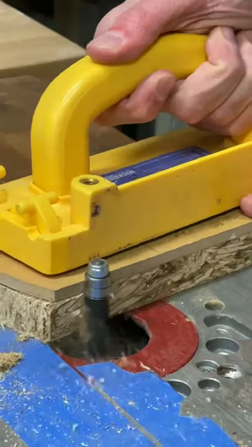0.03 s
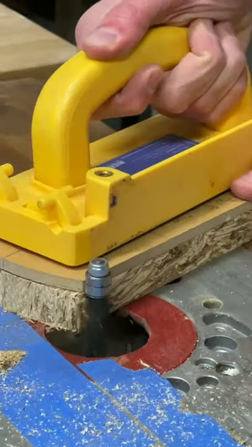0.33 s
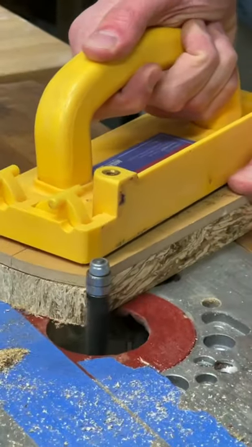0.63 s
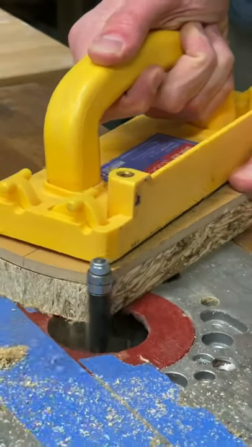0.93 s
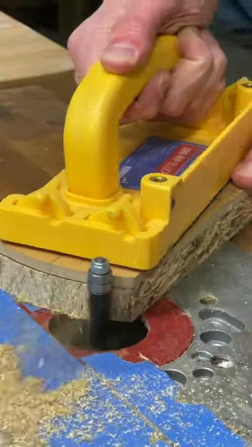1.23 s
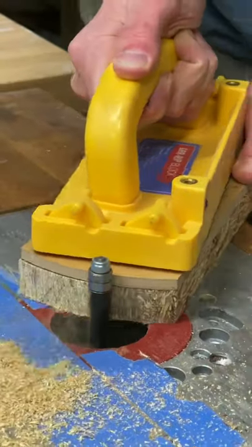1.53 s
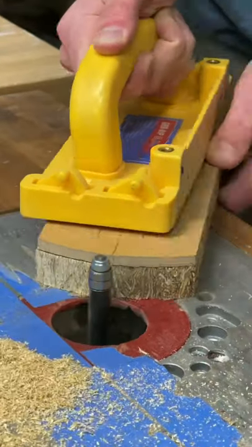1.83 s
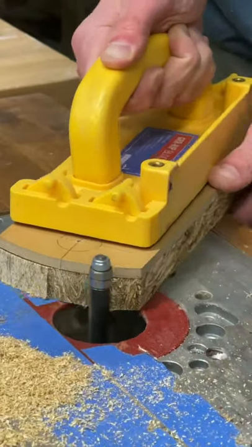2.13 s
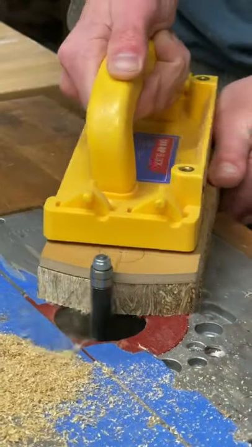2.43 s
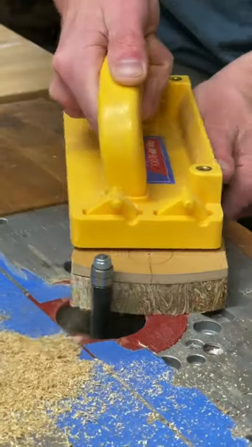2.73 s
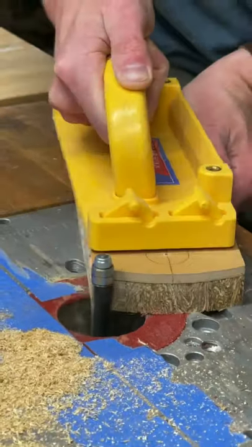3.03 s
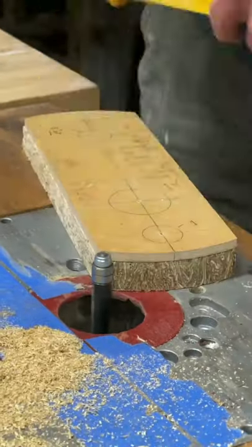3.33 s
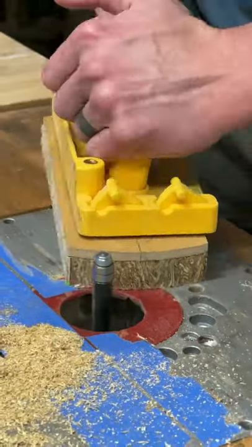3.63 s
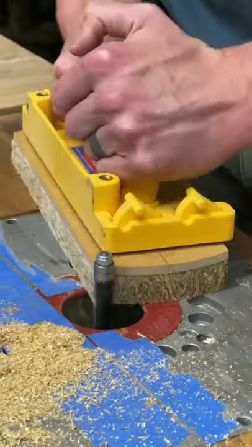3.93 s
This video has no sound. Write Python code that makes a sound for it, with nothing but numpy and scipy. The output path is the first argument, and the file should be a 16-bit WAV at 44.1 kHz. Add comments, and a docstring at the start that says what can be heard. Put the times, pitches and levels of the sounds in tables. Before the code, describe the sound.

A loud router bit rasps through wood, its whine sagging and rising again between cuts.

```python
"""A table router trims the end of a wooden board in three passes, over a rushing dust extractor. It starts in
the cut: the bit chops once a turn and sings in spindle harmonics, roughened by motor buzz, over a hiss of
chips. The motor sags under load, recovers at 1.7 s and sags in the second pass, 2.2 to 3.1 s; the noise dips
briefly after both. At 3.28 s the scene jumps to a faster pace, lifting every pitch. A push block bumps the
board, and the last pass starts at 3.8 s with a brief touch."""
import sys
import numpy as np
from scipy.fft import rfft, irfft, next_fast_len
from scipy.io import wavfile
from scipy.ndimage import uniform_filter1d, map_coordinates

SR = 44100
rng = np.random.default_rng(int(sys.argv[2]) if len(sys.argv) > 2 else 0)


def to_wav(sig):
    """Store sig (one row per channel, or 1-D mono) as 16-bit WAV at the path in sys.argv[1].

    Samples outside -1..1 are clipped; the rate is SR.
    """
    pcm = np.clip(np.atleast_2d(sig), -1, 1) * 32767
    pcm = np.round(pcm).astype(np.int16)
    wavfile.write(sys.argv[1], SR, pcm.T)  # frames by channels


N = 176400
JUMP_S, JUMP_PACE = 3.283, 1.4724  # source frequencies, except the knock's, are given before the jump
BUZZ_HZ = 598  # motor torque pulsing
TOP_HZ = 15780


def amp(db):
    """Decibels to gain."""
    return 10 ** (np.asarray(db) / 20)


def unit(x):
    """Scale to rms 1."""
    return x / np.sqrt(np.mean(x ** 2) + 1e-20)


def clock():
    """Sample times in seconds."""
    return np.arange(N) / SR


def curve(rows):
    """(s, value) points joined by straight lines."""
    return np.interp(clock(), *np.transpose(rows))


def along(points, hz):
    """(Hz, value) points joined on a log axis."""
    point_hz, values = np.transpose(points)
    return np.interp(np.log(hz + 1), np.log(point_hz + 1), values)


def wobble(knots_per_s):
    """Smooth random curve, rms near 1."""
    knots = rng.standard_normal(int(N * knots_per_s / SR) + 4)
    return map_coordinates(knots, [clock() * knots_per_s])


def filtered(x, response):
    """Apply a frequency response."""
    size = next_fast_len(N + SR // 4)
    return irfft(rfft(x, size) * response(np.fft.rfftfreq(size, 1 / SR)), size)[..., :N]


def pace():
    """Frequency factor, stepping up at the jump."""
    return np.where(clock() < JUMP_S, 1, JUMP_PACE)


def angle(hz):
    """Running phase at the scene's pace."""
    return 2 * np.pi * np.cumsum(hz * pace()) / SR


def tone(phase, hz):
    """Sine of rms 1, random start, muted above Nyquist."""
    return np.sqrt(2) * np.sin(phase + rng.uniform(0, 2 * np.pi)) * (hz * pace() < SR / 2)


def noise(spectrum, side_db, fade_s=.006):
    """Nearly mono noise of rms 1; its spectrum moves up at the jump."""
    white = rng.standard_normal(N) + amp(side_db) * rng.standard_normal((2, N))
    slow, fast = [unit(filtered(white, lambda hz: amp(along(spectrum, hz / factor)) * (hz < TOP_HZ)))
                  for factor in (1, JUMP_PACE)]
    blend = np.clip((clock() - JUMP_S) / fade_s + .5, 0, 1)
    return (1 - blend) * slow + blend * fast


# Wood against the bit. Each row: start in seconds, end in seconds.
CONTACT_SPANS = [(-.1, 1.718), (2.16, 3.088), (3.8, 3.85), (3.922, 4.1)]


def contact(ramp_s=.007):
    """1 while the bit is in the wood, 0 while it spins free."""
    t = clock()
    return sum(np.clip(np.minimum(t - start, end - t) / ramp_s + .5, 0, 1) for start, end in CONTACT_SPANS)


# Further hum tones of the motor's supply. Each row: frequency in Hz, level in dB.
LOW_HUM_TONES = [(253, -91), (442, -87), (571, -86.5), (1772, -78)]
# Level of the rush as heard, with drawn dips near 1.8 and 3.2 s like automatic gain recovering.
# Each row: time in seconds, relative level in dB.
DUCKED_RUSH_DB = [(0.0, -71.5), (0.705, -74.5), (0.885, -74), (1.805, -78), (1.825, -73), (2.865, -75.5),
                  (3.175, -76.5), (3.375, -74), (3.94, -71.5), (4.0, -72.5)]
# Extractor airflow. Each row: frequency in Hz, relative density in dB.
RUSH_SPECTRUM = [(30, -45), (70, -47), (120, -32), (190, -13), (255, -3.5), (305, -5.5), (390, 1),
                 (700, 0.5), (1100, 1.5), (1450, 1.5), (2200, 1), (3200, -5), (6000, -27)]


def hum_and_rush():
    """Steady supply hum over a low extractor rush that ducks briefly after the first two passes."""
    drone = sum(amp(db + 2.7 * wobble(9)) * tone(angle(hz) + .48 * wobble(25), hz)
                for hz, db in LOW_HUM_TONES)
    ducked_gain = amp(curve(DUCKED_RUSH_DB) + 5 + .59 * wobble(25.18))
    return drone + ducked_gain * noise(RUSH_SPECTRUM, side_db=-55)


# Supply hum. Each row: frequency in Hz, relative level in dB.
HUM_TONES = [(600.4, -77.5), (1200.8, -87.5), (2401.5, -74.5), (3002, -76.5)]


def supply_hum():
    """Hum of the motor's supply, strongest when the bit spins free."""
    hum = sum(amp(db + wobble(9)) * tone(angle(hz) + .17 * wobble(27), hz) for hz, db in HUM_TONES)
    return hum * amp(2.5 - 3.7 * contact())


def push_block(start_s=3.562, level_db=-66, centre_hz=900, half_width_hz=280, t60_s=.07, attack_s=.0034):
    """Dull knock of plastic set down on the board."""
    age_s = np.maximum(clock() - start_s, 0)
    white = rng.standard_normal(N)
    thud = unit(filtered(white, lambda hz: hz / (1 + ((hz - centre_hz) / half_width_hz) ** 2)))
    return thud * amp(level_db - 60 * age_s / t60_s) * (1 - np.exp(-age_s / attack_s))


# Motor whine. Each row: spindle multiple, relative level in dB, flutter in radians.
WHINE_ORDERS = [(3, -72.5, 0.83), (3.6, -66, .25), (3.88, -74, 2.4), (6.25, -74.5, 2.5), (8, -82, 0.29),
                (9, -84.5, .5), (11.4, -80.5, 1.8), (12, -73, 0.8), (12.6, -73, 2.5), (15, -91, 0.98)]
# Spindle fundamental. Each row: time in seconds, level in dB.
FUNDAMENTAL_DB = [(0.0, -67), (1.26, -73), (1.585, -87), (1.64, -71), (1.725, -81), (1.845, -74),
                  (2.125, -79.5), (2.195, -71), (2.6, -78), (2.625, -83), (2.75, -74), (3.535, -84.5),
                  (3.93, -66), (4.0, -86)]


def motor(spindle_hz, turn_rad, free_hz=1012, max_drop_db=8, sag_scale_hz=45):
    """Spindle tone plus the whine of rotor, fan and bearings, which fades as the speed sags."""
    whine = sum(amp(db + 2.2 * wobble(17)) * tone(order * turn_rad + rad * wobble(90), order * spindle_hz)
                for order, db, rad in WHINE_ORDERS)
    sag_hz = np.maximum(free_hz - spindle_hz, 0)
    drop_db = max_drop_db * (1 - np.exp(-sag_hz / sag_scale_hz))
    fundamental = amp(curve(FUNDAMENTAL_DB) + 2.4 * wobble(20)) * tone(turn_rad, spindle_hz)
    return whine * amp(3.5 - drop_db) + fundamental


# Level of chip and fan hiss as heard, with drawn dips at 1.71 and 3.1 s like automatic gain recovering.
# Each row: time in seconds, relative level in dB.
DUCKED_HISS_DB = [(0.0, -55), (0.045, -50.5), (0.105, -55), (0.195, -52), (0.275, -55.5), (0.405, -59),
                  (0.7, -57), (0.815, -53.5), (1.105, -54.5), (1.185, -52.5), (1.33, -56), (1.69, -56.4),
                  (1.71, -62.9), (1.795, -60), (1.835, -57), (2.005, -57), (2.34, -56.5), (2.455, -47.5),
                  (2.47, -55), (3.07, -58), (3.1, -61), (3.28, -57), (3.285, -60), (4.0, -55)]
# Chip spray and cooling fan. Each row: frequency in Hz, relative density in dB.
CHIP_SPECTRUM = [(900, -35), (2000, -9), (2700, -4), (3400, 0), (4200, 2), (5200, 0), (7500, -1),
                 (10000, -2), (12500, -5.5), (15500, -11)]
FAN_SPECTRUM = [(900, -41.5), (2000, -10), (2700, -3), (3400, -4.5), (4300, -5), (5200, 0.5), (5850, -1.5),
                (6280, 3), (6800, 0.5), (7600, -5.5), (10000, -5.5), (12500, -5), (15500, -10.5)]


def chips_and_fan(turn_rad, turn_depth=.45, buzz_depth=.14):
    """Fan hiss gives way in the cut to chips, which fly in bursts tied to the turning bit."""
    chip_share = contact() * np.clip((curve(RASP_DB) + 70) / 11, 0, 1)
    bursts = (1 + turn_depth * np.sin(turn_rad)) * amp(.9 * wobble(700) + .7 * wobble(28))
    chips = noise(CHIP_SPECTRUM, side_db=-17) * unit(bursts)
    fan = noise(FAN_SPECTRUM, side_db=-20.5)
    hiss = np.sqrt(chip_share) * chips + np.sqrt(np.abs(1 - chip_share)) * fan
    pulsing = 1 + buzz_depth * np.sin(angle(BUZZ_HZ))
    return amp(curve(DUCKED_HISS_DB) - 1.5 + .73 * wobble(40)) * pulsing * hiss


# Board and table modes. Each row: centre in Hz, half-width in Hz, boost in dB.
BOARD_MODES = [(3800, 160, 11.5), (4210, 100, 7.5), (5370, 160, 8.5), (6895, 110, 11.5), (7240, 240, 10.5)]


def board_gain(hz):
    """Resonances of board and table lift passing harmonics."""
    return amp(sum(db / (1 + ((hz - centre) / width) ** 2) for centre, width, db in BOARD_MODES))


# Board howl, bit shriek, whistle and rasp. Each row: time in seconds, relative level in dB.
HOWL_DB = [(0.0, -56), (0.085, -78), (0.1, -86), (0.21, -65.5), (0.25, -82), (0.275, -65), (0.385, -81),
           (0.685, -82), (0.795, -56), (0.83, -68), (0.87, -51.5), (1.235, -51.5), (1.33, -59),
           (1.575, -59), (1.65, -54), (1.71, -57), (1.725, -88), (2.19, -78), (2.205, -62), (2.26, -83),
           (2.355, -52), (2.375, -65), (2.45, -46.5), (3.05, -55), (3.105, -77.9), (3.805, -85),
           (3.82, -66), (4.0, -70)]
SHRIEK_DB = [(0.0, -60), (0.05, -51.5), (0.64, -56.5), (0.76, -51.5), (0.785, -60), (0.825, -49),
             (1.035, -52.5), (1.065, -75), (1.17, -56.5), (1.265, -62), (1.285, -57), (1.375, -50),
             (1.555, -61), (1.62, -51), (1.71, -54), (1.73, -76), (2.145, -76), (2.16, -64), (2.21, -55),
             (2.3, -68), (2.335, -43.5), (2.405, -53.5), (2.47, -46.5), (2.535, -63.5), (2.625, -63),
             (2.645, -51), (2.79, -64), (2.83, -56), (3.075, -52.5), (3.1, -74), (3.785, -73), (3.82, -60),
             (3.905, -76), (3.915, -48), (3.96, -42), (4.0, -56)]
WHISTLE_DB = [(0.0, -72), (0.19, -71), (0.265, -56), (0.7, -79), (0.8, -59), (0.86, -68), (1.305, -65),
              (1.335, -75), (1.44, -61), (1.53, -76), (1.64, -68), (1.7, -77), (2.405, -75), (2.45, -59.5),
              (3.05, -60.5), (3.075, -76), (3.905, -76), (4.0, -68)]
RASP_DB = [(0.0, -57.5), (0.27, -57), (0.52, -63), (0.675, -67.5), (0.77, -55.5), (1.09, -58), (1.25, -56),
           (1.32, -59.5), (1.49, -59), (1.695, -60.5), (1.73, -81), (1.79, -70.9), (2.14, -80),
           (2.36, -60.7), (2.395, -53.5), (2.65, -55.5), (2.695, -62.5), (2.77, -57), (3.055, -63),
           (3.095, -74.0), (3.91, -69.5), (4.0, -56.5)]
# Rasp and its high, even sizzle. Each row: spindle multiple, relative level in dB.
RASP_ORDERS = [(3, -7.5), (5, -9), (6, -5.5), (7, -10), (9, -16), (11, -19), (13, -15), (15, -21.5),
               (17, -19)]
SIZZLE_ORDERS = [(10, -5), (12, -5.5), (14, -11), (16, -6.5), (18, -6.5)]


def cutter(spindle_hz, turn_rad, flutter_rad=.03):
    """The bit chops once a turn; each harmonic swells with the grain."""
    bit_rad = turn_rad + flutter_rad * wobble(260)
    buzz_rad = angle(BUZZ_HZ)

    def harmonic(order, sideband_db):
        """One spindle multiple with two sidebands from the torque buzz."""
        phase, hz = order * bit_rad + .12 * wobble(120), order * spindle_hz
        upper = amp(-5) * tone(phase + buzz_rad, hz)
        lower = amp(-11) * tone(phase - buzz_rad, hz)
        return tone(phase, hz) + amp(sideband_db) * (upper + lower)

    howl = amp(curve(HOWL_DB) - .05 + 2.6 * wobble(30.07)) * harmonic(order=2, sideband_db=-25)
    shriek = amp(curve(SHRIEK_DB) - .1 + 1.8 * wobble(45)) * harmonic(order=4, sideband_db=-10)
    whistle = amp(curve(WHISTLE_DB) - 1.5 + 4.1 * wobble(35)) * harmonic(order=8, sideband_db=-5)
    rasp_db = curve(RASP_DB) - 2
    rasp = np.zeros(N)
    for order, db in RASP_ORDERS + SIZZLE_ORDERS:
        grain_db = 2.8 * wobble(16) + 1.8 * wobble(70)
        gain = amp(rasp_db + db + grain_db) * board_gain(order * spindle_hz)
        rasp += gain * harmonic(order, sideband_db=-2)
    return contact() * (howl + shriek + whistle + rasp)


# Spindle speed. Each row: time in seconds, turns per second before the pace factor.
SPINDLE_HZ = [(0.0, 966), (0.03, 951), (0.07, 949), (0.09, 935), (0.185, 916), (0.26, 914), (0.505, 941),
              (0.61, 948), (0.71, 937), (0.765, 917), (0.85, 852), (0.96, 836), (1.005, 844), (1.085, 812),
              (1.165, 813), (1.17, 823), (1.265, 819), (1.29, 828), (1.4, 835), (1.435, 828), (1.505, 842),
              (1.6, 836), (1.665, 820), (1.72, 875), (1.73, 900), (1.77, 942), (1.85, 984), (1.925, 996),
              (2.085, 1008), (2.19, 1005), (2.32, 990), (2.345, 967), (2.435, 857), (2.45, 837),
              (2.56, 805), (2.59, 806), (2.645, 832), (2.685, 832), (2.7, 846), (2.79, 842), (2.805, 832),
              (2.845, 839), (2.895, 864), (2.995, 855), (3.07, 869), (3.15, 961), (3.23, 990), (3.275, 996),
              (3.28, 1011), (3.795, 1011), (3.895, 1003), (3.935, 985), (3.985, 923), (4.0, 922)]
# Stereo balance. Each row: frequency in Hz, left minus right in dB.
BALANCE_DB = [(60, 0), (1200, 0), (1700, 0), (2600, -1), (3400, -2), (4300, -1.2), (6500, -.3), (15000, 0)]
# Stereo phase. Each row: frequency in Hz, lead of the left port in radians.
LEAD_RAD = [(0, 0.16), (2410, -0.0), (3010, 0.021), (5080, -0.29), (5340, -0.0011), (5600, 0.39),
            (6800, 0.072), (11500, -0.18), (13400, 0.34), (14000, 0.089), (15000, 0.36), (16500, 0.099)]


def scene():
    """One spindle drives motor and cutter, close to a pair of microphone ports."""
    spindle_hz = uniform_filter1d(curve(SPINDLE_HZ), size=400, mode="nearest") + .9 * wobble(28)
    turn_rad = angle(spindle_hz)
    mix = hum_and_rush() + supply_hum() + push_block()
    mix += motor(spindle_hz, turn_rad) + chips_and_fan(turn_rad) + cutter(spindle_hz, turn_rad)
    side = np.array([[.5], [-.5]])  # left, right
    return filtered(mix, lambda hz: amp(along(BALANCE_DB, hz) * side)
                    * np.exp(1j * along(LEAD_RAD, hz) * side))


def record(dry):
    """The microphone sheds deep bass and everything above TOP_HZ."""
    return filtered(dry, lambda hz: amp(along([(40, -11.5), (170, -.5)], hz)) * (hz < TOP_HZ))


dry = scene()
out = record(dry)
to_wav(out)
```